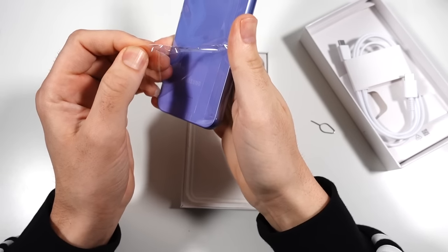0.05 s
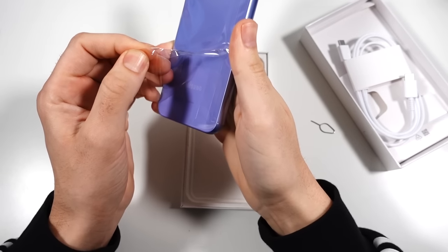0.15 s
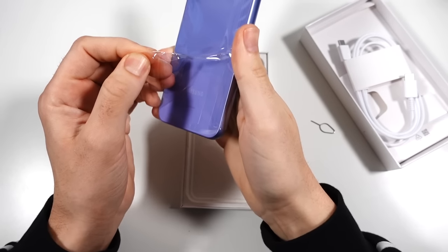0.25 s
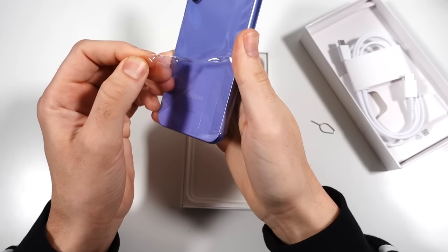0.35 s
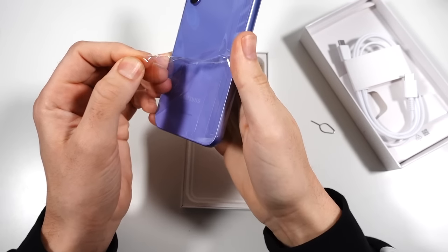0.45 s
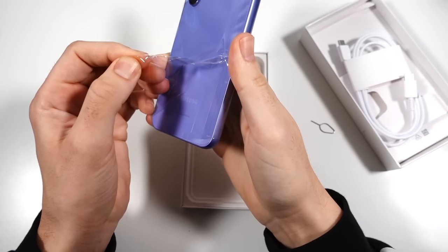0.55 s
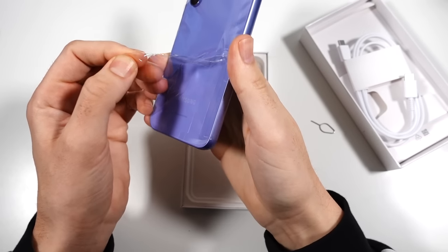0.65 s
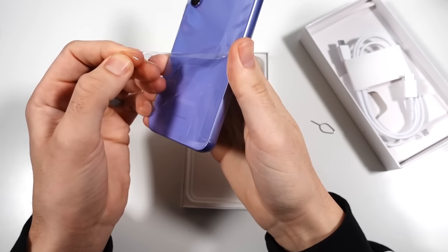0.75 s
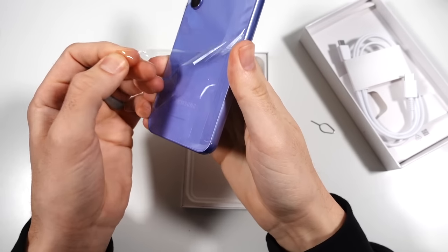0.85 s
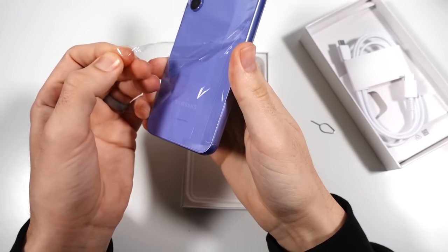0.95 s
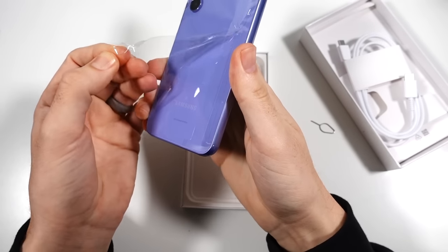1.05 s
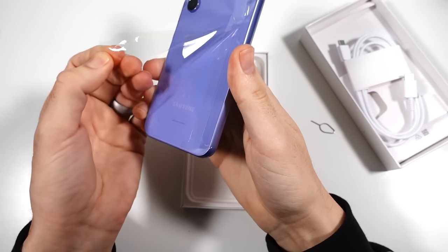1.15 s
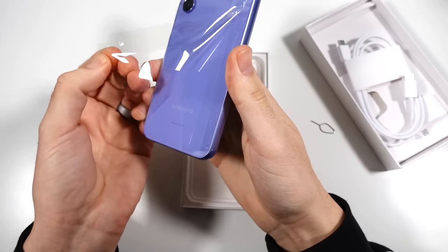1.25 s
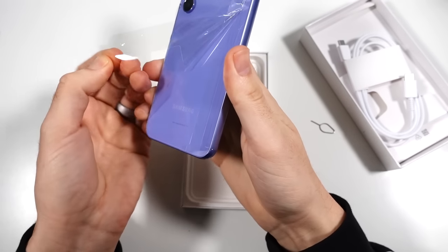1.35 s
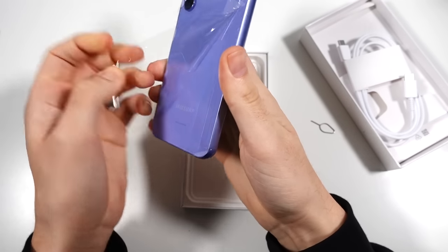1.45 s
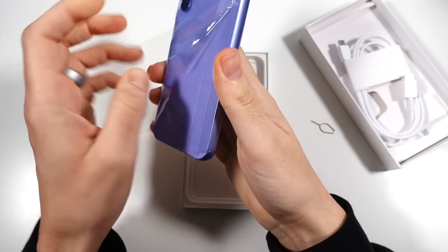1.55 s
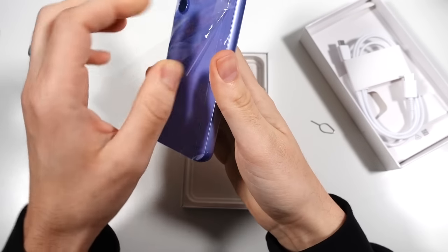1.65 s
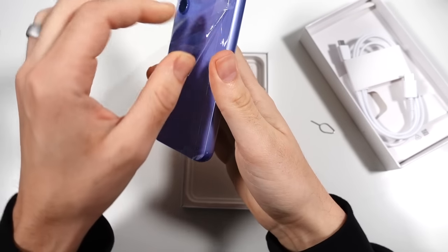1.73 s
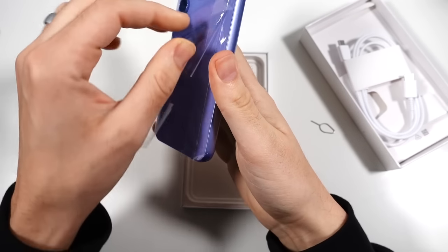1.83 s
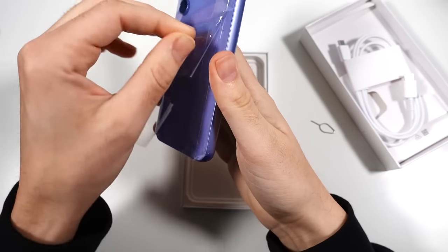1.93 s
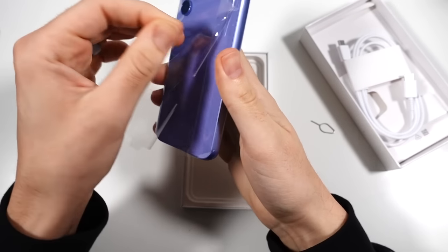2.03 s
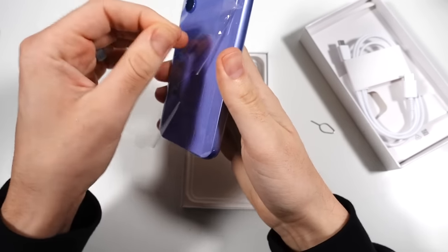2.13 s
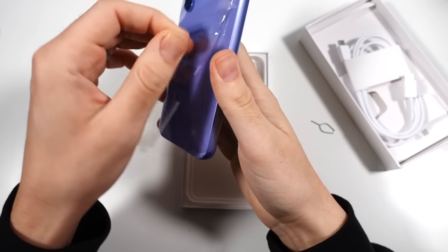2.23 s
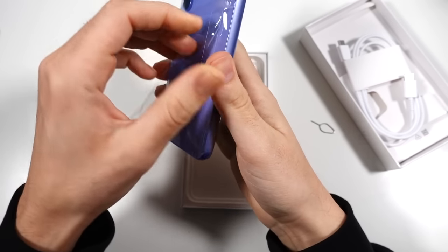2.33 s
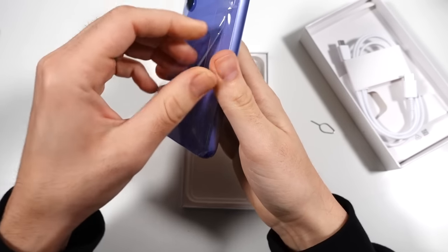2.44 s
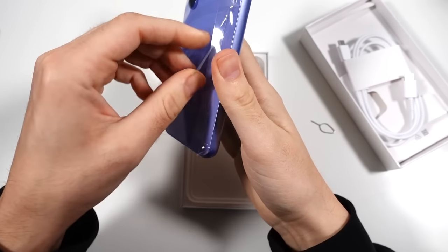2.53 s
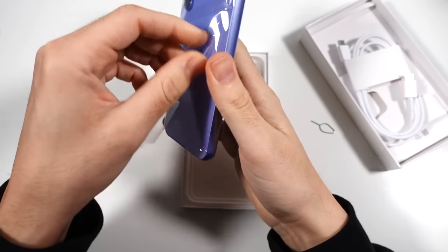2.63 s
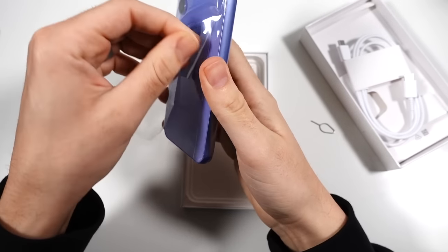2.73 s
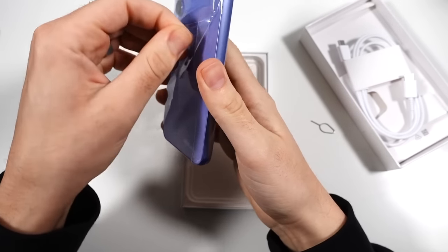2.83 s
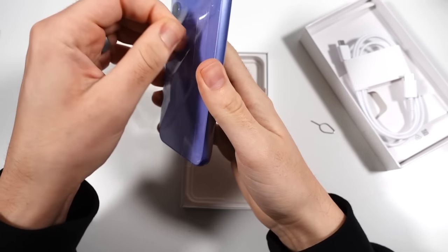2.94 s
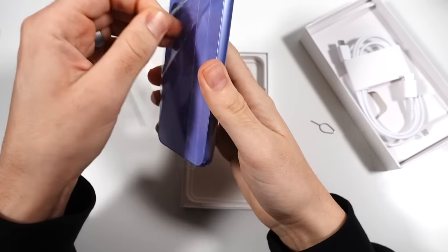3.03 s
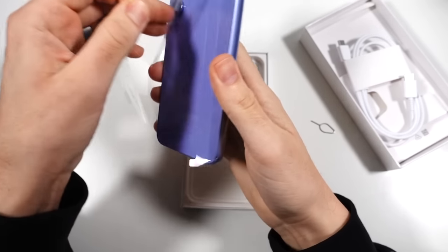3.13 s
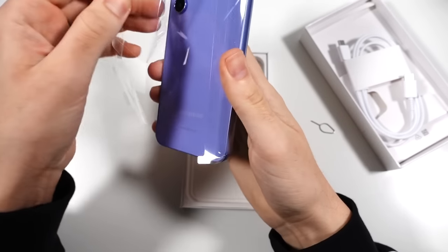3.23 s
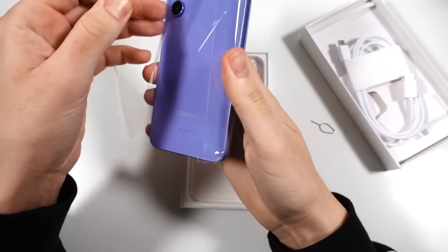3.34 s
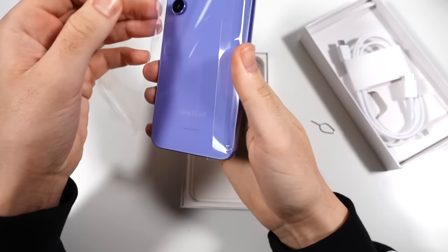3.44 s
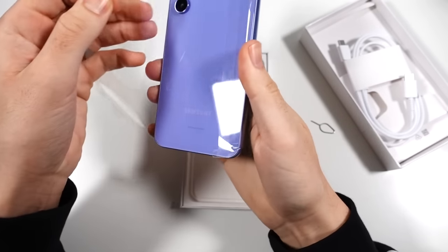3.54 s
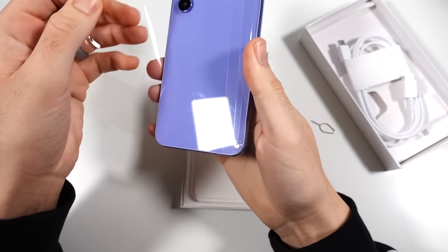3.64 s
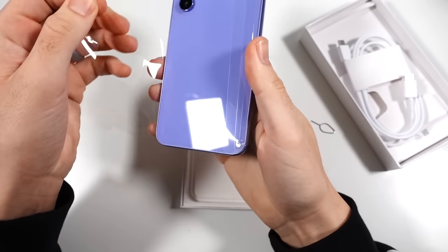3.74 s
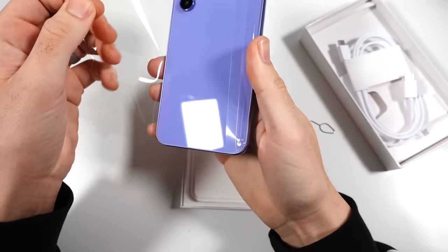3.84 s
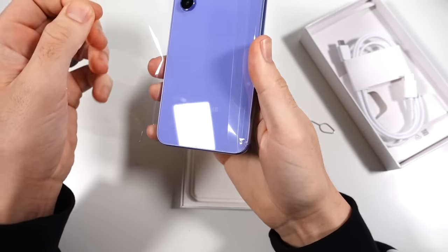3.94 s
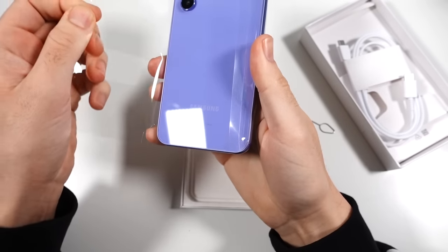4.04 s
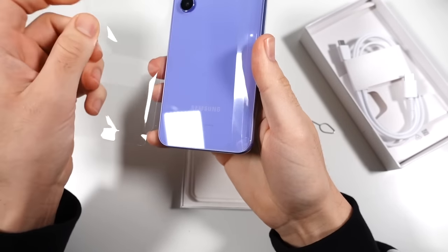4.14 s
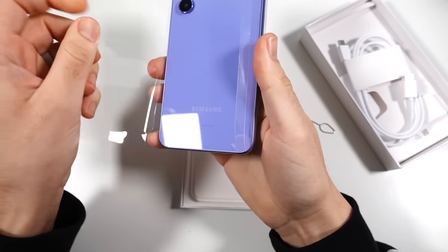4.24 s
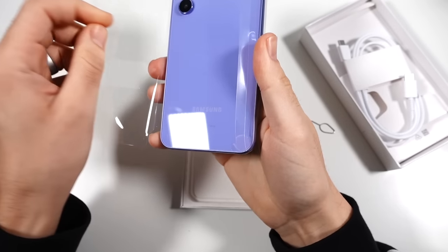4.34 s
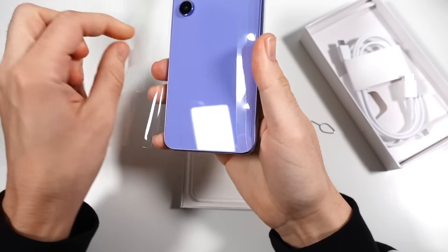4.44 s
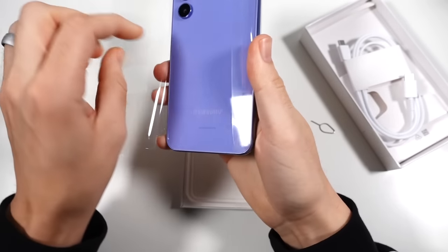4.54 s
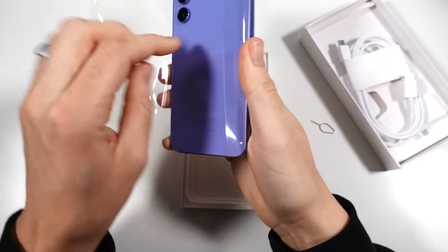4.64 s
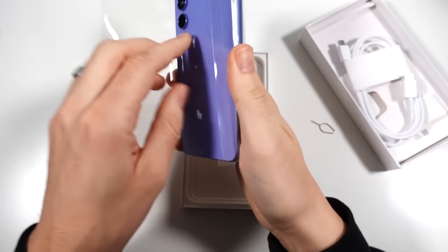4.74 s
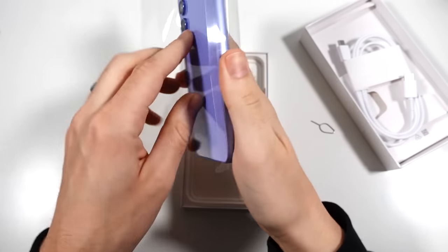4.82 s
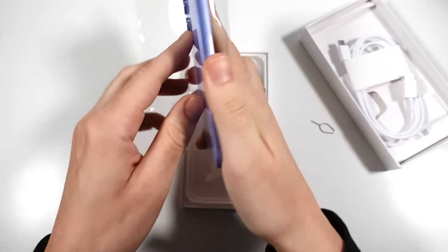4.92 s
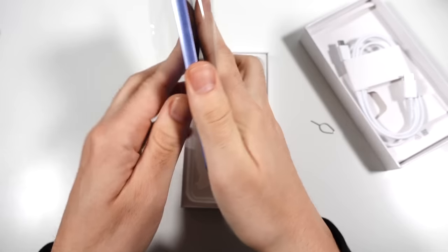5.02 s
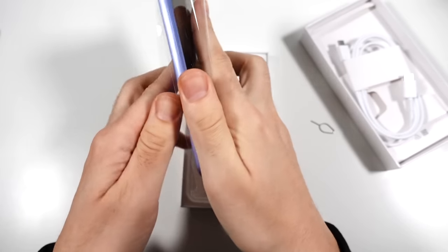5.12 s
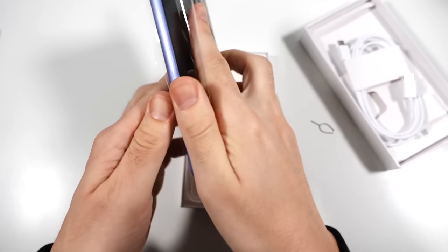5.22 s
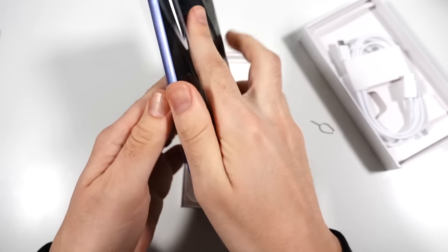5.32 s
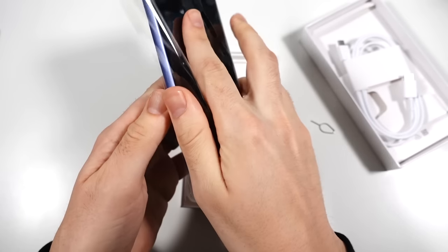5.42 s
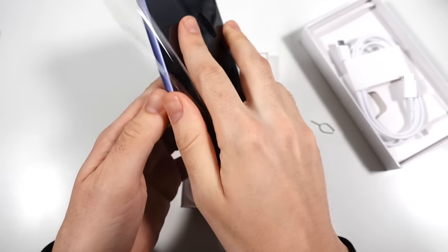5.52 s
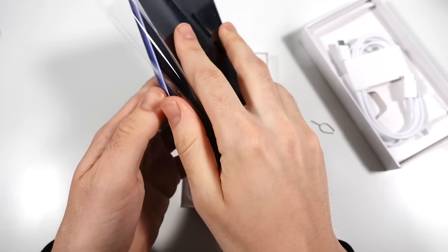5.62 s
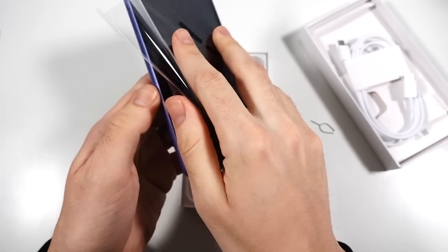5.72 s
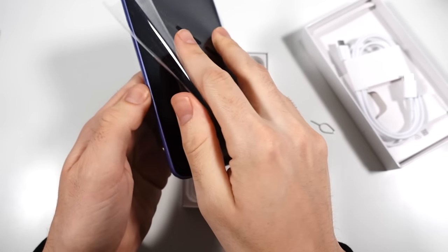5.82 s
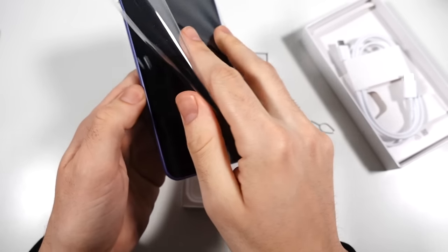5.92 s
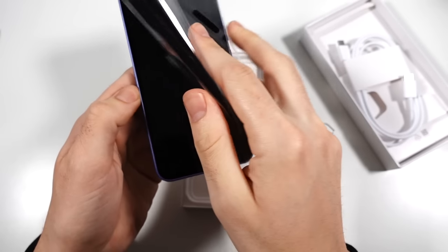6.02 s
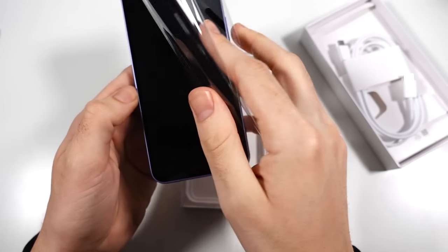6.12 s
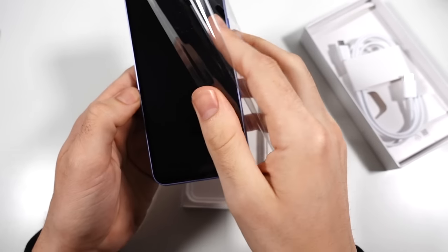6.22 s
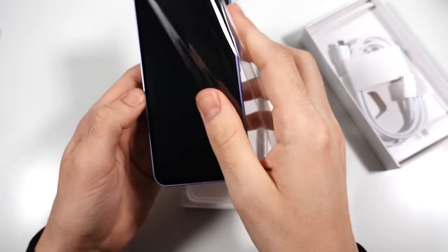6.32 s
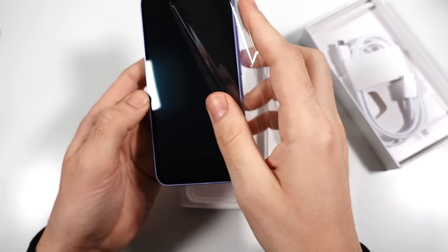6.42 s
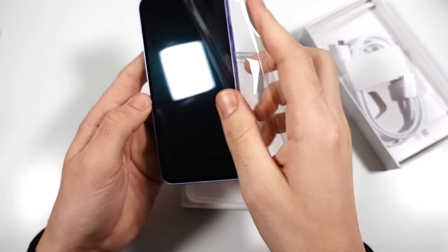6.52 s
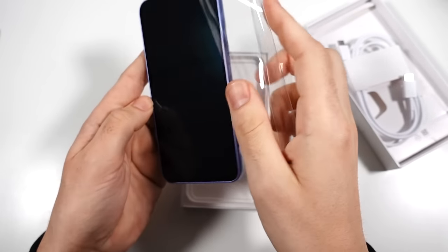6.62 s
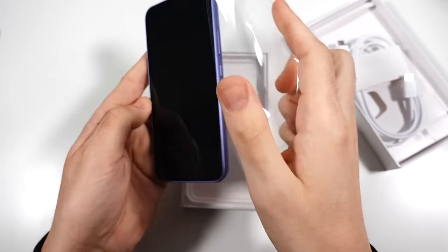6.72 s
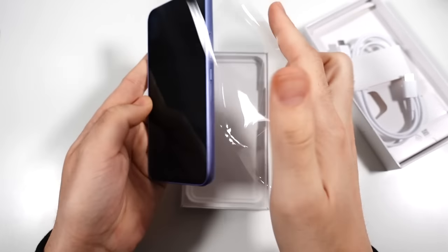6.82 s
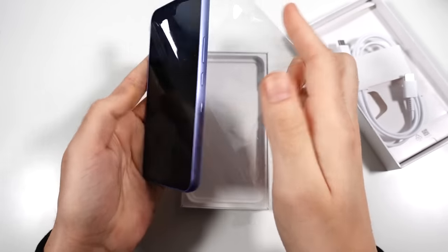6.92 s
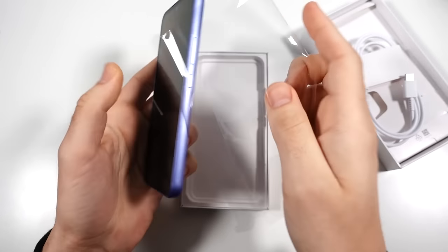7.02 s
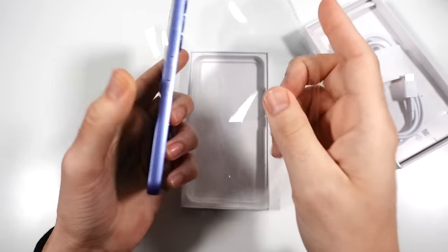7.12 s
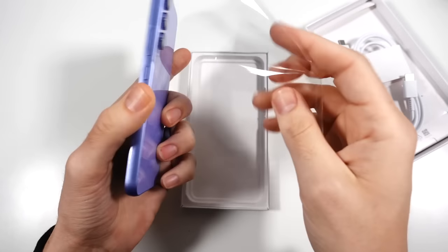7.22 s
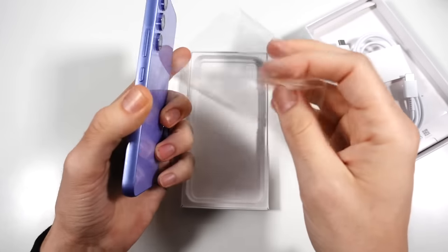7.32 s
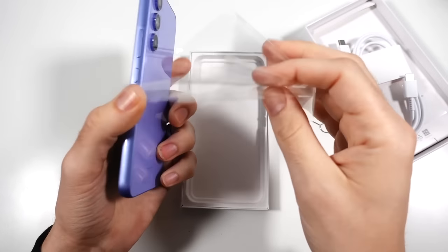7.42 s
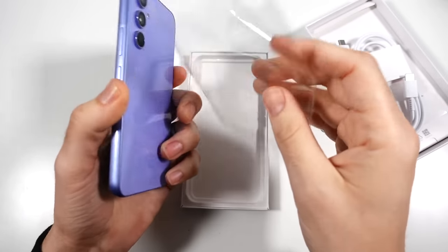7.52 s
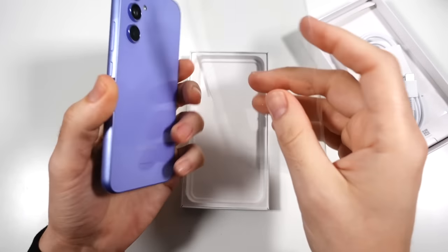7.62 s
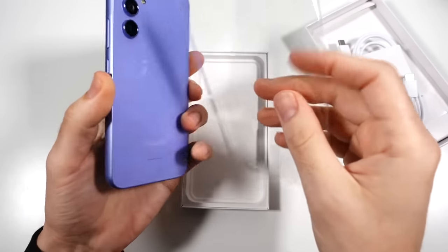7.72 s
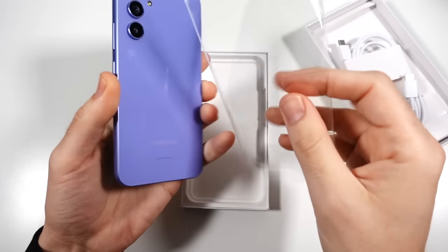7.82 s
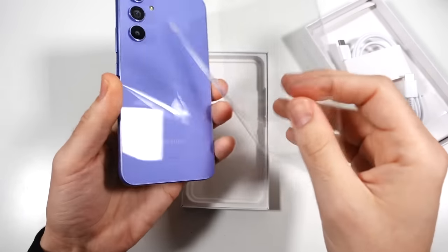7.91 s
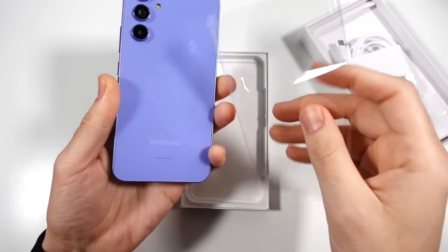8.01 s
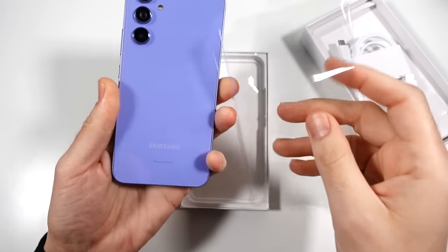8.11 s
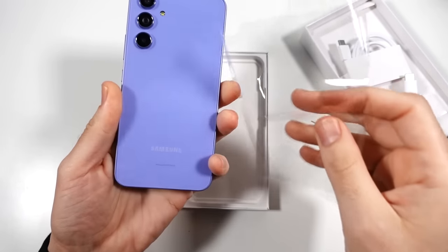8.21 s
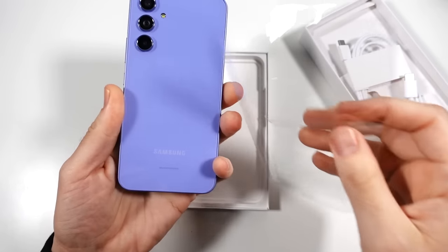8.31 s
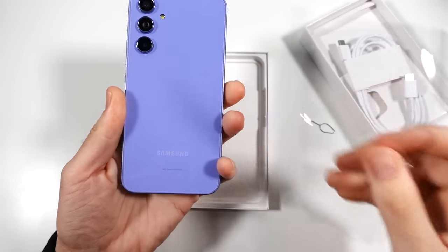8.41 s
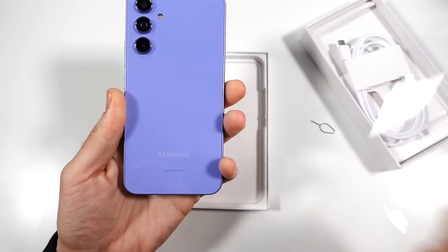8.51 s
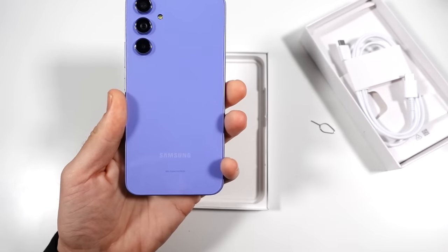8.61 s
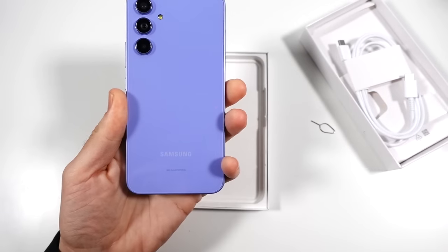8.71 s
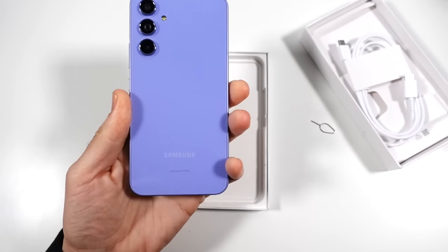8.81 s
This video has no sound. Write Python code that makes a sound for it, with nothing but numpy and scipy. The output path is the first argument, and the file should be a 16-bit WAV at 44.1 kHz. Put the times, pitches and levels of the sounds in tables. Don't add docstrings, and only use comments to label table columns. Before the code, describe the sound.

Crisp plastic crackle comes in uneven bursts, starting nearly silent, then taut and bright, later duller and looser as the sheet folds. Fingertips tap faintly, the flapping sheet thumps air at the close microphone, and a tiny squeak slips out as a finger rubs it. The loudest snaps slightly overload; each leaves a short, soft room tail over faint hiss.

```python
import sys
import numpy as np
from scipy import signal
from scipy.fft import rfft, irfft, next_fast_len
from scipy.io import wavfile
from scipy.ndimage import uniform_filter1d

SR = 44100
rng = np.random.default_rng(int(sys.argv[2]) if len(sys.argv) > 2 else 0)


def undo_db(level):
    steps = np.asarray(level, float) / 20
    return 10 ** steps


def generate_wav(sig):
    pcm = np.round(np.clip(np.atleast_2d(sig).T, -1, 1) * 32767).astype(np.int16)
    wavfile.write(sys.argv[1], SR, pcm)


N = 390726
BLOCK, LEAD = 4096, 512


def evened(x):
    return x / np.sqrt(np.mean(x ** 2, -1, keepdims=True) + 1e-20)


def smoothed_noise(shape, size, passes=1):
    noise = rng.standard_normal(shape)
    for _ in range(passes):
        noise = uniform_filter1d(noise, size=size)
    return evened(noise)


def read(points, hz):
    f, value = np.transpose(points)
    return np.interp(np.log(hz + 1), np.log(f + 1), value)


def curve(rows):
    s, *columns = np.transpose(rows)
    return [np.interp(np.arange(N) / SR, s, column) for column in columns]


def coloured(x, points):
    size = next_fast_len(N)
    gain = undo_db(read(points, np.fft.rfftfreq(size, 1 / SR)))
    return evened(irfft(rfft(x, size) * gain, size)[:N])


def split(x):
    dull_hz, bright_hz = 1800, 8000
    edges = (dull_hz, "low"), ((dull_hz, bright_hz), "band"), (bright_hz, "high")
    return [signal.sosfilt(signal.butter(3, hz, kind, fs=SR, output="sos"), x) for hz, kind in edges]


def buckles(t60, crease_hz, boom_db, count, crease_db=10.0, crease_octaves=0.27):
    # hz [Hz], density_db [dB per Hz]
    film_response = [(120, -12.5), (300, -18), (520, -11.5), (790, -11), (1150, -9.5), (2040, -6),
                     (4030, -4.5), (6510, -6.5), (12200, -18), (14500, -24.5), (16400, -30.5)]
    lumps_db, stutter, dull_ring, hollow_hz = 2.5, 0.55, 1.8, 780
    rise = t60 / 40
    t = (np.arange(BLOCK) - LEAD) / SR - rise[:, None]
    hz = np.fft.rfftfreq(BLOCK, 1 / SR)

    lumps = smoothed_noise((count, len(hz)), 90, passes=2)
    octaves = np.log2((hz + 1) / crease_hz[:, None])
    lean = crease_db * np.exp(-(octaves / crease_octaves) ** 2)
    hollow = 1 / (1 + ((hz - hollow_hz) / 130) ** 2)
    lean = lean + np.maximum(boom_db, 0)[:, None] * hollow
    below = np.clip(-octaves - 0.3, 0, 1.5)
    lean = lean + 0.5 * np.minimum(boom_db, 0)[:, None] * below

    film_db = np.maximum(read(film_response, hz), -60)
    cepstrum = irfft(np.log(undo_db(film_db + lumps_db * lumps + lean)))
    cepstrum[:, 1:2048] *= 2
    cepstrum[:, 2049:] = 0
    patch = np.exp(rfft(cepstrum))

    slips = rng.standard_normal(t.shape)
    uneven = stutter * (1 + 5.5 * t60[:, None])
    slips *= np.exp(uneven * smoothed_noise(t.shape, 24))

    def sound(ring):
        shape_db = np.where(t < 0, 10 * t / rise[:, None], -60 * t / ring[:, None])
        z = rfft(slips * undo_db(np.maximum(shape_db, -120)))
        flat = z / uniform_filter1d(abs(z) ** 2, size=90) ** 0.4
        return irfft(flat * patch)

    dull = split(sound(dull_ring * t60))[0]
    _, middle, bright = split(sound(t60))
    return [p / np.linalg.norm(p, axis=1, keepdims=True) for p in (dull, middle, bright)]


def snaps(s, energy_db, dull_db, bright_db, t60_ms, crease_hz):
    t60 = np.clip(t60_ms, 3, 90) / 1000
    boom_db = np.clip(dull_db + 8, -16, 11)
    dull, middle, bright = buckles(t60, crease_hz, boom_db, count=len(s))
    sounds = middle + undo_db(dull_db)[:, None] * dull + undo_db(bright_db)[:, None] * bright
    out = np.zeros(N + 2 * BLOCK)
    for start, db, sound in zip(s, energy_db, sounds):
        out[round(start * SR):][:len(sound)] += undo_db(db) * sound
    return out[LEAD:][:N]


def crinkle(per_s=1000, spread_db=3.3):
    # time_s [s], level_db [dB], dull_db [dB], bright_db [dB]
    crinkle_course = [(0, -73, -12.5, -6), (0.36, -63.5, -2.5, -9), (0.54, -76, -2, -7),
                      (0.95, -53, -9.5, -14.5), (1.35, -54.5, 1, -11.5), (1.72, -75, 0.5, -14),
                      (2.2, -57.5, -10.5, -3.5), (2.42, -70.5, -6, -10), (2.8, -62, 2.5, -20),
                      (3.05, -47, -5, -10), (3.9, -70, 8.5, -10), (5.3, -53.5, 3, -14), (6.5, -45, -8, -9),
                      (6.56, -56, -2, -4), (6.8, -43, -6.5, -13), (7.4, -73, 12.5, -19.5),
                      (8.15, -62.5, 6, -15.5), (8.86, -55, -6.5, -4.5)]
    level_db, dull_db, bright_db = curve(crinkle_course)
    kinds, clump_db = 10, 3.4
    clumps = smoothed_noise(N, 400, passes=2)
    slack = np.clip(1 + dull_db / 22, 0.1, 1)
    spread = spread_db * (np.minimum(rng.exponential(1, N), 4) - 7.0)
    grains = undo_db(slack * (spread + clump_db * clumps))
    grains *= rng.random(N) < per_s / SR
    trains = grains * (rng.integers(0, kinds, N) == np.arange(kinds)[:, None])
    parts = buckles(np.geomspace(0.003, 0.010, kinds), rng.uniform(1300, 6500, kinds),
                    np.linspace(0, 8, kinds), count=kinds)
    dull, middle, bright = (evened(signal.oaconvolve(trains, p[:, :1536], axes=1).sum(0)[:N])
                            for p in parts)
    return undo_db(level_db) * (middle + undo_db(dull_db) * dull + undo_db(bright_db) * bright)


def puffs(lumpy=0.33):
    # time_s [s], level_db [dB]
    stir = [
        (0, -65),
        (2.8, -63.5),
        (3.2, -57),
        (7.5, -55),
        (8.1, -48),
        (8.3, -66.5),
        (8.86, -72),
    ]
    # hz [Hz], density_db [dB per Hz]
    air_spectrum = [(12, -30), (22, -1.5), (65, 2), (150, -7.5), (400, -42)]
    lumps = np.exp(lumpy * smoothed_noise(N, 1500))
    return undo_db(curve(stir)[0]) * coloured(rng.standard_normal(N) * lumps, air_spectrum)


def hush():
    # hz [Hz], density_db [dB per Hz]
    hush_spectrum = [(60, -16), (150, -18.5), (230, -9), (450, -28), (2000, -48.5), (4630, -27),
                     (10700, -40.5), (16000, -43.5), (16600, -65)]
    return undo_db(-67) * coloured(rng.standard_normal(N), hush_spectrum)


def ticks(bright_db=-18.0, t60_ms=66.0, crease_hz=3200.0):
    # start_s [s], energy_db [dB]
    crisp = [(.426, -20.5), (.441, -35), (.454, -30), (.471, -35), (.061, -32), (.938, -6), (1.1308, -20),
             (1.8598, -12.5), (1.9542, -19), (2.042, -11.5), (2.0616, -17.5), (2.1895, -17), (2.2149, -11),
             (2.3047, -20), (2.3513, -25), (2.581, -16), (2.6532, -19), (2.869, -24.5), (2.877, -12.5),
             (2.9974, -6), (6.0704, -1), (6.1202, -28), (6.796, -17), (7.3062, 2), (8.4849, -10.5),
             (8.524, -1), (7.936, -28), (8.325, -44), (8.6425, -12), (8.7393, -29.5), (8.7693, -17.5)]
    # start_s [s], energy_db [dB]
    plain = [(1.4372, -11.5), (1.455, -8.5), (2.2742, -16.5), (2.5473, -15), (2.6215, -19.5), (2.733, -26),
             (2.776, -22), (3.3929, -4), (3.8437, -21.5), (5.466, -3), (5.497, -11), (5.551, -9),
             (5.6546, -5), (6.631, -4.5), (6.7986, -3), (6.862, -9), (6.904, -5), (6.9172, -8),
             (7.3575, -8.5), (7.3761, -4), (7.4767, -10.5), (7.529, -9.5), (7.574, -6), (7.7097, -10.5),
             (7.761, -16), (8.5073, -5.5), (8.5344, -4.5), (8.6179, -8.5)]
    # start_s [s], energy_db [dB]
    soft = [(.403, -26), (1.4206, -12.5), (1.4974, -14), (1.6056, -23), (1.6254, -21.5), (1.8127, -24),
            (2.2443, -14.5), (3.2489, -10), (4.6293, -11), (4.7916, -2.5), (4.8273, -6), (4.8543, -15),
            (4.9373, -7), (5.0518, -13.5), (5.0593, -16), (5.991, -13.5), (6.3966, -8.5), (6.6586, -12.5),
            (6.8198, -5.5), (7.0814, -8.5), (7.2373, -2.5), (7.3334, -6.5), (7.5797, -16), (7.624, -10),
            (7.8494, -13), (8.032, -25), (8.18, -22), (8.22, -15), (8.2406, -16.5), (8.3381, -16.5)]
    # start_s [s], energy_db [dB]
    pats = [(3.3328, -7), (3.4642, -18), (4.167, -14), (4.3458, -35), (4.3626, -7.5), (4.4258, -11),
            (4.7735, -4), (6.2053, -16), (7.0618, -10.5), (7.888, -16.5), (8.0046, -26), (8.122, -16),
            (8.1998, -17), (7.751, -23.5), (7.841, -21), (7.961, -24), (7.973, -37), (8.275, -32)]
    kinds = [(crisp, -16), (plain, -6), (soft, -1.6), (pats, 1.5)]  # (events, dull part dB)
    s, energy_db = np.vstack([rows for rows, _ in kinds]).T
    dull_db = np.concatenate([np.full(len(rows), db) for rows, db in kinds])
    scatter = rng.standard_normal((len(s), 3)).T
    return snaps(s, energy_db, dull_db,
                 bright_db - 0.76 * dull_db + 4.0 * scatter[0],
                 t60_ms * np.exp(0.5 * scatter[1] + 0.03 * energy_db),
                 crease_hz * np.exp(0.21 * scatter[2] - 0.025 * dull_db))


def fine(energy_db=7.5, dull_db=-12.0, bright_db=-21.0, t60_ms=14.4):
    # start_s [s], peak_db [dB], crease_hz [Hz]
    fine_creases = [(0.166, -54, 4190), (0.409, -29, 1610), (0.436, -40, 5630), (0.447, -41, 4840),
                    (0.932, -8.5, 6000), (1.131, -16, 7390), (1.236, -6.5, 3680), (1.419, -18, 3410),
                    (1.466, -24, 3050), (1.483, -18, 3850), (1.5, -28, 1930), (1.551, -39, 4400),
                    (1.581, -33, 2830), (1.86, -23, 3890), (1.939, -31, 4560), (1.954, -20, 3020),
                    (2.019, -18.5, 4310), (2.059, -23.5, 4650), (2.311, -32, 4430), (2.361, -38.5, 5930),
                    (2.425, -42, 4540), (2.459, -42, 3200), (2.478, -34.5, 4170), (2.653, -19, 6000),
                    (2.826, -32.5, 1540), (2.845, -45, 1550), (2.863, -43, 2980), (2.869, -20.5, 2970),
                    (2.998, -15, 5500), (3.069, -18, 5600), (3.491, -14, 2110), (3.964, -39, 1910),
                    (3.978, -45, 1320), (3.991, -49, 1920), (4.018, -46, 1880), (4.346, -36, 2380),
                    (4.608, -30, 7200), (4.63, -23, 2550), (4.753, -32, 4350), (4.868, -28, 4600),
                 (5.06, -23, 3370), (5.146, -17, 1680), (5.211, -28, 1220), (5.391, -22, 1800),
                 (5.451, -24, 4390), (5.504, -22, 2350), (5.536, -23, 5020), (5.812, -26.5, 4290),
                 (5.844, -27, 1720), (6.078, -14, 3930), (6.119, -16.5, 2060), (6.127, -17, 3150),
                 (6.903, -11.5, 2790), (7.135, -16, 2620), (7.306, -4.5, 4630), (7.336, -21, 3290),
                 (7.66, -26, 1370), (7.897, -51, 1860), (7.971, -37, 1830), (7.985, -34, 2940),
                 (8.009, -36, 1880), (8.027, -32, 1290), (8.084, -36, 1240), (8.096, -41, 1430),
                 (8.136, -28, 3780), (8.272, -38, 1390), (8.277, -36, 1280), (8.324, -31, 2810),
                 (8.395, -43, 1800), (8.413, -31, 5200), (8.738, -29.5, 7400), (8.777, -29, 2270),
                 (8.802, -47, 7030), (8.824, -30.5, 2460)]
    s, peak_db, hz = np.array(fine_creases).T
    height = np.log2(hz / 4000)
    return snaps(s, peak_db + energy_db, dull_db - 8.3 * height, bright_db + 6.1 * height,
                 t60_ms * 0.65 ** height, hz)


def knocks():
    # start_s [s], peak_db [dB]
    knock_events = [(0.294, -39), (0.941, -47), (1.015, -40.5), (1.218, -31), (1.284, -34), (2.845, -42),
                    (3.709, -42), (3.777, -30.5), (3.824, -24.5), (3.9434, -37.5), (4.067, -37),
                    (4.05, -54), (4.299, -43), (5.211, -45), (8.063, -38)]
    # mode_hz [Hz], level_db [dB], t60_s [s]
    hollow_modes = [(760, 2, 0.024), (1360, -11, 0.02), (2400, -3, 0.011)]
    t, out = np.arange(BLOCK) / SR, np.zeros(N + BLOCK)
    grips = rng.standard_normal((len(knock_events), len(hollow_modes)))
    for (s, db), grip in zip(knock_events, grips):
        ring = np.zeros(BLOCK)
        for (hz, mode_db, t60), g in zip(hollow_modes, grip):
            ring += undo_db(mode_db + 2 * g - 60 * t / t60) * np.sin(2 * np.pi * hz * (1 + g / 15) * t)
        scuff = uniform_filter1d(uniform_filter1d(rng.standard_normal(len(t)), size=7), size=5)
        ring += undo_db(-2.5 - 60 * t / 0.022) * scuff
        out[round(s * SR):][:len(t)] += undo_db(db) * ring * np.minimum(t / 0.00063, 1)
    return out[:N]


def swings(rows, cycles):
    out, t = np.zeros(N), np.arange(N) / SR
    for (s, db, hz), phase in zip(rows, rng.random(len(rows))):
        near = slice(max(round((s - 0.3) * SR), 0), round((s + 0.4) * SR))
        turns = (t[near] - s) * hz + 0.4
        away = turns * np.where(turns < 0, 2, 1) / cycles
        out[near] += np.sqrt(2) * undo_db(db - 72 * away ** 2) * np.sin(2 * np.pi * (turns + phase))
    return out


def flaps():
    # time_s [s] 0.4 swing after the peak, level_db [dB], swing_hz [Hz]
    slow_sway = [
        (.31, -49.5, 28.2),
    ]
    # time_s [s] 0.4 swing after the peak, level_db [dB], swing_hz [Hz]
    flap_events = [(1.179, -48.5, 106), (1.806, -48, 101), (2.51, -43.5, 99), (3.109, -37.5, 91.7),
                   (3.322, -58, 101.6), (4.151, -36.5, 71), (4.399, -35, 93), (4.452, -28.5, 75.5),
                   (4.786, -40, 104), (4.927, -40, 74), (5.155, -41.5, 71.5), (6.052, -48, 91.5),
                   (6.285, -38, 100), (6.789, -38, 55.7), (6.836, -35, 69.5), (7.235, -33, 100),
                   (7.321, -38.5, 55), (7.629, -35, 62.6), (7.764, -44, 79), (7.913, -39, 93),
                   (7.96, -48, 100), (4.0, -49.5, 59.4), (1.5, -48.5, 60), (5.43, -44, 60), ]
    return swings(flap_events, cycles=2.46) + swings(slow_sway, cycles=21.0)


def rustles(count=12, t60_ms=18.0, bright_db=-11.5):
    # start_s [s], length_s [s], grain_energy_db [dB], dull_db [dB], crease_hz [Hz]
    brushes = [(.37, 0.079, -32.5, -12, 9100), (.7, .022, -32, -5, 6000), (3.66, .06, -38, 5.5, 1500),
               (3.86, .06, -44, 8, 1210), (4.15, 0.07, -35.5, 6.5, 1500), (4.27, .06, -43.5, 5, 1200),
               (5.76, .07, -26, -15, 8040), (3.83, 0.027, -25.5, 1, 4450), (3.95, .05, -52, 13, 2000),
               (4.07, .07, -37, 5, 2000), (5.01, 0.019, -38, 9, 1960), (5.57, .04, -12.5, -5, 2980),
               (7.39, .04, -23.5, -11, 4000), (7.75, .07, -29, -0.5, 5000), (7.92, 0.022, -39, -18, 4950),
               (8.0, .06, -33, 6, 2480), (8.08, 0.035, -40, 8, 2000), (8.14, .08, -26.5, -1, 4500),
               (8.335, 0.022, -32, -12, 3500), (8.7, 0.13, -31, -18, 12200), (2.73, .06, -32.5, -6, 5000),
               (6.72, .05, -19, -12, 9000), (8.39, .045, -32.5, 2.5, 3500)]
    start, length, db, dull_db, hz = np.repeat(brushes, count, axis=0).T
    a, b, c, d = rng.random((len(start), 4)).T
    return snaps(start + length * (a + b) / 2, db + 5.2 * (c - 0.5), dull_db,
                 bright_db - 0.32 * dull_db, t60_ms * np.ones(len(db)), hz * 2 ** (d - 0.5))


def stage_snaps(typical_hz=4000, typical_ms=15):
    # start_s [s], energy_db [dB], dull_db [dB], t60_ms [ms], crease_hz [Hz]
    first_pull = [(.6099, -8.5, -10.5, 19, 3220), (.6487, -9.5, -13, 5.8, 7760),
                  (.7233, 14, -19.5, 28, 4260), (.7251, 13.5, -17.5, 3.2, 6400), (.8467, 11, -26, 10, 6240),
                  (.8846, 19, -25, 3.1, 5460), (.949, -8, -29.5, 2, 8600), (.9952, 3.5, -19.5, 9.2, 6500),
                  (1.0438, -6.5, -19, 15, 3680), (1.09, -8, -12, 17, 3400), (1.1387, 1.5, -12, 15, 7600),
                  (1.178, 18, -8, 10.4, 3380), (1.2306, 8.5, -12.5, 12, 6900), (1.402, -8.5, -11, 20, 5960),
                  (1.4451, -8.5, -13.5, 5.3, 2270), (1.491, -2, -16, 23, 4760),
                  (2.029, -6, -11.5, 34, 4460), (2.498, -5, -10.5, 70, 4120)]
    # start_s [s], energy_db [dB], dull_db [dB], t60_ms [ms], crease_hz [Hz]
    back_pull = [(2.8899, -6, -25, 9.9, 4520), (2.909, 12, -30, 12.7, 4240), (2.941, -4.5, -6.5, 19, 2790),
                 (2.9662, 12.5, -15.5, 6.6, 4960), (2.973, 16.5, -18.5, 30, 5700),
                 (3.0304, 11.5, -23, 7.6, 6150), (3.089, 3, -37, 8.1, 3500), (3.0954, 15, -19, 21, 5900),
                 (3.1146, 15, -11, 53, 4400), (3.1202, 17.5, -48, 6, 4170), (3.155, 4, -3, 12, 2670),
                 (3.1625, 14.5, -15, 23, 5800), (3.1665, 14.5, -14, 22, 2570),
                 (3.2862, -3.5, -12, 13, 6000), (3.3172, 5.5, -7, 11, 4460), (3.3749, -4.5, -12, 7.5, 4870),
                 (3.4966, -10.5, 5.5, 20, 2340), (3.6397, 5, -8, 13, 6600), (3.6583, -3.5, -4.5, 30, 3020),
                 (3.7761, -10.5, -2.5, 24, 2960)]
    # start_s [s], energy_db [dB], dull_db [dB], t60_ms [ms], crease_hz [Hz]
    turning = [(4.138, 6, -8, 25, 4000), (4.3726, -12, 5, 39, 2000), (4.3877, 0.5, -5, 19, 1940),
               (4.3992, 1.8, -2.5, 15, 2460), (4.4448, -1.5, 3, 110, 6030), (4.4504, 4.5, -7, 51, 6230),
               (4.4682, -0.5, -23, 16, 1890), (4.7808, -0.5, -15, 6.2, 4320), (4.914, 2, -3, 41, 1630),
               (4.9207, 6, -18, 20, 4970), (5.1377, 1.5, -4, 11.7, 3470), (5.3342, 13.5, -18.5, 14.4, 5700),
               (5.4244, -6, -4.5, 43, 1690), (5.5648, -1, -10, 14, 5200), (5.572, 4.5, -11, 150, 5800),
               (5.6741, -1.5, -5, 87, 1750), (5.7559, -0.5, -9.5, 82, 5000)]
    # start_s [s], energy_db [dB], dull_db [dB], t60_ms [ms], crease_hz [Hz]
    front_pull = [(5.897, 11.5, -13, 34, 3670), (5.968, 1.5, -6.5, 22, 4450), (6.049, 9.5, -7, 19, 2700),
                  (6.057, 1.5, -19, 11, 3020), (6.0632, 6.5, -8, 45, 3600), (6.088, -2.5, -3, 39, 3700),
                  (6.2543, 0.5, -11, 39, 3230), (6.274, 11, -10.5, 28, 4900), (6.2883, -1, -2, 12, 3500),
                  (6.4138, -3.5, -6, 18, 5060), (6.6237, -3, -7.5, 18, 5300), (6.7123, 0, -2.5, 140, 3360),
                  (6.7659, -2.5, -12, 12, 3820), (6.7756, 2, -8, 57, 3200), (6.8111, -0.5, -9.5, 21, 3000),
                  (6.8417, 2.3, -5, 69, 2900), (6.8747, -4, -2.5, 110, 2400), (6.9112, -3, -13, 23, 6400)]
    # start_s [s], energy_db [dB], dull_db [dB], t60_ms [ms], crease_hz [Hz]
    carried_off = [(7.1089, -7.5, -6, 26, 2530), (7.1441, 5.5, -6.5, 23, 2400), (7.2165, 13, -7, 56, 2420),
                   (7.2252, 9, -11, 72, 3080), (7.277, 3.5, -6, 87, 3200), (7.2993, 0.5, -11, 32, 4600),
                   (7.3091, -4, -1.5, 27, 3280), (7.6136, -3, -1.5, 110, 1810), (7.6379, 5, -11, 36, 3940),
                   (8.4342, -3, -16, 19, 5030), (8.5425, -0.3, -5.5, 25, 2640), (8.5626, 1.5, -9, 80, 2650),
                   (8.5716, -2.5, -6, 17, 2880), (8.8477, -4.5, -19, 10, 8900)]
    stages = [(first_pull, -7.5), (back_pull, -8.5), (turning, -10), (front_pull, -9.5),
              (carried_off, -12.5)]
    db_per_octave, db_per_ring_doubling = 5, -1.5
    s, energy_db, dull_db, t60_ms, crease_hz = np.vstack([rows for rows, _ in stages]).T
    bright_db = np.concatenate([np.full(len(rows), db) for rows, db in stages])
    bright_db = bright_db + db_per_octave * np.log2(crease_hz / typical_hz)
    bright_db = bright_db + db_per_ring_doubling * np.log2(t60_ms / typical_ms)
    return snaps(s, energy_db, dull_db, bright_db, t60_ms, crease_hz)


def squeak(width_hz=970.0):
    # time_s [s], level_db [dB], pitch_hz [Hz]
    squeak_course = [
        (7.44, -52, 3780),
        (7.452, -45, 3970),
        (7.47, -39.5, 5050),
        (7.5, -55, 5630),
    ]
    level_db, hz = curve(squeak_course)
    t, r, out = np.arange(N) / SR, np.exp(-np.pi * width_hz / SR), 0
    hz = hz * (1 + 0.06 * smoothed_noise(N, 300))
    for db, factor in (0, 1), (-3, 1.85):
        turn = np.exp(2j * np.pi * np.cumsum(factor * hz) / SR)
        noise = rng.standard_normal(N) + 1j * rng.standard_normal(N)
        fuzz = signal.lfilter([1], [1, -2 * r, r * r], noise)
        out = out + undo_db(db) * evened((turn * fuzz).real)
    out = out * undo_db(3.7 * smoothed_noise(N, 120))
    return undo_db(level_db) * out * (t > squeak_course[0][0]) * (t < squeak_course[-1][0])


def room(x, build_up_s=0.0012, patchy_db=1.5):
    # hz [Hz], t60_s [s]
    decay = [(250, 0.52), (1000, 0.41), (4000, 0.53), (12000, 0.28)]
    hz, t, z = signal.stft(x, SR, nperseg=256, noverlap=192)
    power = uniform_filter1d(abs(z) ** 2, size=21, axis=0)
    hop_s = t[1] - t[0]
    fill = np.exp(-hop_s / build_up_s)
    power = signal.lfilter([0, 0, 0, 0, 1 - fill], [1, -fill], power)
    keep = undo_db(-120 * hop_s / read(decay, hz))
    power = np.array([signal.lfilter([1 - k], [1, -k], p) for k, p in zip(keep, power)])
    a, b, patches = rng.standard_normal((power.shape[1], len(hz), 3)).T
    patches = uniform_filter1d(uniform_filter1d(patches, size=8, axis=1), size=10, axis=0)
    power *= undo_db(2 * patchy_db * patches / patches.std())
    tail = np.sqrt(2 * power) * (a + 1j * b)
    return signal.istft(tail, SR, nperseg=256, noverlap=192)[1][:N]


def scene():
    film = crinkle() + ticks() + fine() + knocks() + rustles() + stage_snaps() + squeak()
    air = puffs() + flaps()
    return (film + undo_db(-15) * room(film) + air + hush())[None]


def low_pass(x):
    return signal.sosfilt(signal.butter(12, 16520, fs=SR, output="sos"), x)


def record(dry):
    power_db = 10 * np.log10(abs(uniform_filter1d(dry[0] ** 2, size=64)) + 1e-12)
    fall_db = np.arange(N) * 137.0 / SR
    held_db = np.maximum.accumulate(power_db + fall_db) - fall_db
    over_db = np.maximum(held_db + 18.5, 0)
    late_db = uniform_filter1d(over_db, size=201, origin=100)
    clipped = np.clip(dry / undo_db(0.38 * late_db), -1, 1)
    lowpass = signal.firwin(255, 16350, window=("kaiser", 8), fs=SR)
    limited = signal.oaconvolve(clipped, lowpass[None], "same")
    return low_pass(limited)


dry = scene()
out = record(dry)
generate_wav(out)
```